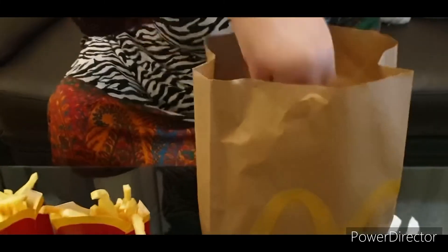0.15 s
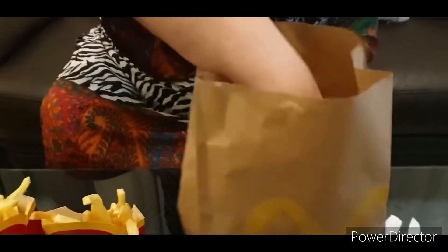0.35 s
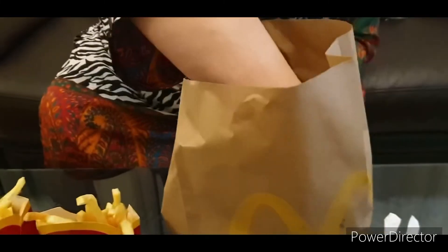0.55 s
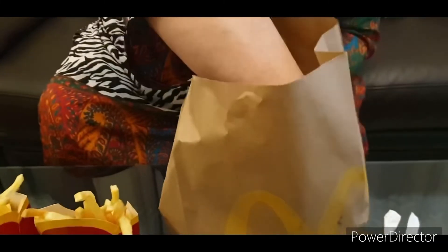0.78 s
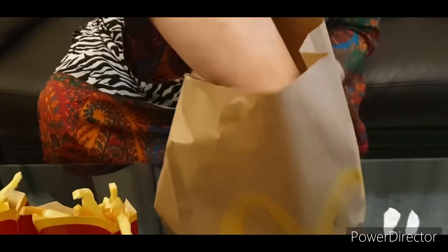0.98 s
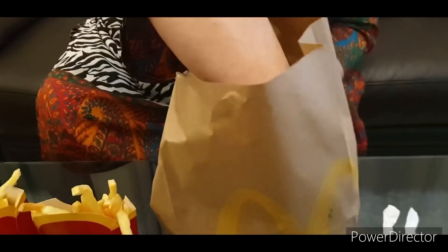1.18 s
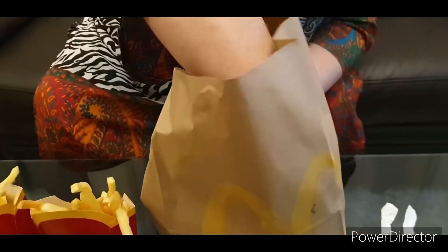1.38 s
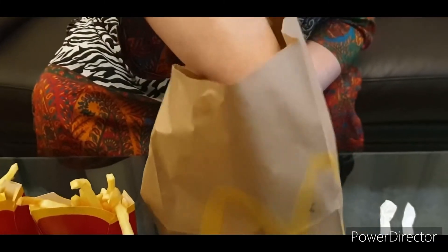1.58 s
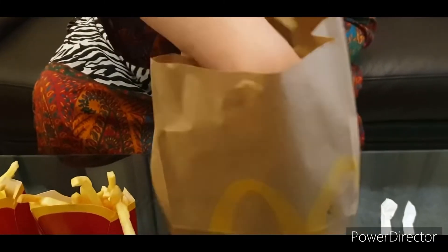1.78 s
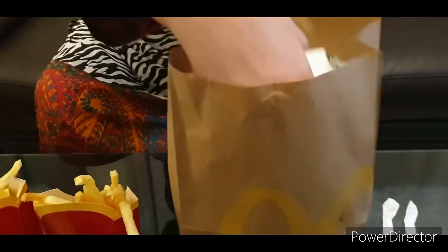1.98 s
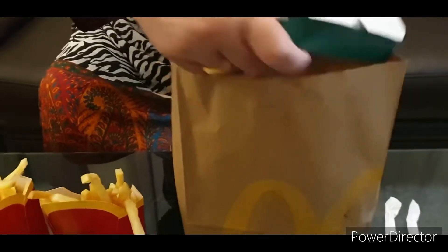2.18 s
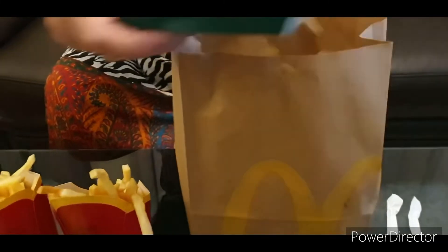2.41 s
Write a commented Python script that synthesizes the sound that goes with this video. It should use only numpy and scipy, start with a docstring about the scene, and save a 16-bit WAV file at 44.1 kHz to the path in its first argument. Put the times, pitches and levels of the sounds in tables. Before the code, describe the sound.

A hand rummages in a stiff paper bag, close and slightly left, in a quiet small room. Nearly silent until 0.2 s, then crinkling and skin hiss; the hardest snaps come at 0.45-0.6 s. It softens around 0.7-0.9 s, crackles densely with dull wall thumps at 0.95-1.3 s, continues in separate snaps to 1.8 s, then thins to light rustles and fades by 2.3 s.

```python
"""In a quiet room, a hand rummages in a paper bag close to a phone.
Creases snap over as short bursts of noise that excite the resonances of the paper, and
dull pushes ring the low modes of the bag when a whole wall pops over. Small crinkles run between
them as decaying noise, the flexing walls rumble, and skin slides along the paper with a rough hiss.
The room adds a short diffuse tail over a faint floor of coloured noise."""
import sys
import numpy as np
from scipy import signal
from scipy.fft import rfft, irfft
from scipy.io import wavfile
from scipy.ndimage import uniform_filter1d, map_coordinates

SR = 44100
rng = np.random.default_rng(int(sys.argv[2]) if len(sys.argv) > 2 else 0)


def to_wav(sig):
    """Store sig (one row per channel, or 1-D mono) as 16-bit WAV at the path in sys.argv[1].

    Samples outside -1..1 are clipped; the rate is SR.
    """
    pcm = np.clip(np.atleast_2d(sig), -1, 1) * 32767
    pcm = np.round(pcm).astype(np.int16)
    wavfile.write(sys.argv[1], SR, pcm.T)  # frames by channels


N = 108045
T = np.arange(N) / SR  # time in seconds

# Background noise spectrum. Each row: frequency in Hz, relative level in dB.
FLOOR_SPECTRUM = [(40, 0), (500, -4), (1300, -12), (7000, -34), (14000, -18)]
# Strength of the handling. Each row: time in seconds, wall flexing in dB, crinkling in dB.
HANDLING = [(0, -54.5, -54), (.09, -73, -80.5), (.18, -58.5, -87), (.22, -43.5, -40.5), (.44, -46, -48),
            (.74, -53, -51.5), (.85, -61.5, -68), (.93, -47.5, -41.5), (1.13, -50, -58.5),
            (1.24, -38.5, -40.5), (1.37, -64.5, -54), (1.45, -47, -49), (1.57, -52, -56.5),
            (1.68, -46, -38.5), (1.84, -46.5, -43), (2.0, -63, -56), (2.13, -46, -44), (2.24, -51.5, -62),
            (2.31, -69.5, -95)]
# Low modes of the bag. Each row: frequency in Hz, gain in dB.
BAG_MODES = [(125, 5), (167, 6.5), (229, 3), (288, -3.5)]
# Modes of the paper. Each row: frequency in Hz, gain in dB.
PAPER_MODES = [(660, -0.5), (930, -7), (1880, -6), (2310, -7)]
# Colours of the crinkles, one to each crinkle. Each row: reference frequency in Hz, relative level in dB.
CRINKLE_COLOURS = [(500, -1.5), (900, 2), (1500, -0.5), (2300, -3.5), (3600, -5.5), (5800, -8.5)]
# Creases snapping over. Each row: start in seconds, drive level in dB, reference pitch of the paper in Hz,
# treble drive against that level in dB, decay time of the treble in ms.
CREASE_SNAPS = [(0.132, -42, 1800, -34, 2), (0.208, -23, 2210, -15.5, 4.2), (0.252, -23.5, 1520, 0, 5.2),
                (.26, -12, 1750, -28, 3.6), (.272, -25.5, 1560, -0.5, 3), (0.357, -19.5, 1920, -15, 2.6),
                (0.386, -15.5, 1980, -10, 4), (0.462, -12.5, 1280, -15, 2.56), (.521, -6, 1930, -5, 2.4),
                (0.591, -4, 2620, -1, 1.02), (0.671, -19.5, 1340, -23, 1.64), (0.78, -27.5, 2250, -24, 1),
                (0.875, -23, 2760, -24, 2.25), (0.936, -24, 1080, -18, 4.8), (.956, -19.5, 970, -9, 2.2),
                (0.989, -14, 1940, -8.5, 2.66), (1.1, -26.5, 630, -46, 3.9), (1.159, -20, 1430, -16, 8.2),
                (1.185, -12.5, 1620, -10, 5.1), (1.193, -17, 780, -4, 3.1), (1.219, -14.5, 2280, -11, 3.1),
                (1.258, -12, 1860, -9, 3.9), (1.269, -12.5, 1010, -9, 3.34), (1.407, -22, 3080, -22, 0.96),
                (1.433, -10.5, 2230, -13, 0.51), (1.445, -24, 600, -19, 5.5), (1.513, -31.5, 1140, -32, 4),
                (1.616, -12.5, 1530, -15, 0.7), (1.714, -12, 1050, -9.5, 3.9),
                (1.783, -12, 1510, -13, 2.15), (1.941, -24, 1790, -30, 2.8), (2.097, -25, 1750, -21, 4.1),
                (2.159, -19.5, 1074, -19, 1.9), (2.33, -42, 755, -44.5, 14.3)]
# Treble spectrum of a snap. Each row: frequency in Hz, gain in dB.
SNAP_TREBLE = [(1500, -16), (3500, 1.5), (6800, -6), (10000, -4), (15000, -13.5)]
# Strength of the sliding skin. Each row: time in seconds, level in dB.
SKIN_LEVELS = [(.18, -92), (.24, -49.5), (.6, -63.5), (.83, -69.5), (.95, -59.5), (1.38, -67.5),
               (1.44, -55.5), (1.65, -50), (2.12, -50), (2.32, -90)]
# Spectrum of the sliding hiss. Each row: frequency in Hz, relative level in dB.
SLIDE_SPECTRUM = [(1000, -8.5), (4000, -3), (12500, 2.5), (15000, -12)]
# Whole walls popping over. Each row: start in seconds, drive level in dB.
WALL_THUMPS = [(.27, -37), (0.389, -36), (0.524, -30.5), (0.676, -33.5), (0.986, -33.5), (1.195, -31),
               (1.271, -29), (1.716, -31.5)]

MODE_Q = 7.5
CRINKLES_PER_S, CRINKLE_SPREAD_DB, CRINKLE_MS = 1500, 2.5, 3.14  # all colours together; decay time
PAPER_STRETCH, TREBLE_LATE_S = 1.97, 0.0014  # decay of the paper against that of the treble; delay
THUMP_MS = 1.1  # rise time of the push
BOOM_APART, PAPER_APART, TREBLE_APART = .22, .4, 1.0  # difference against common part, left and right
FLOOR_DB = -74.5
ROOM_DB, ROOM_T60_S, ROOM_BASS_T60_S = -7.5, .26, .3
LEFT_DB, LEFT_LEAD = 4, 2.7  # left against right; lead in samples
NOTCH_HZ, NOTCH_WIDTH_HZ, LOW_CUT_HZ, TOP_HZ = 7300, 500, 50, 16000


def undb(db):
    """Decibels express the logarithm of an amplitude ratio."""
    return 10 ** (np.asarray(db) / 20)


def unit(x):
    """Division by the root mean square gives unit effective amplitude."""
    return x / np.sqrt(np.mean(x ** 2))


def band(x, lo_hz, hi_hz):
    """A Butterworth band-pass confines a sound to a range of frequencies."""
    return signal.sosfilt(signal.butter(2, [lo_hz, hi_hz], "band", fs=SR, output="sos"), x)


def ring(x, modes):
    """By superposition, the response of a resonant body is the sum of its modes."""
    return sum(undb(db) * signal.lfilter(*signal.iirpeak(hz, MODE_Q, SR), x) for hz, db in modes)


def colour(x, points):
    """A minimum-phase filter, found from the folded cepstrum, imposes a dB curve causally."""
    hz, db = np.array(points, float).T
    bins_hz = np.fft.rfftfreq(2048, 1 / SR)
    log_gain = np.interp(np.log(bins_hz + 1), np.log(hz), db) * np.log(10) / 20
    cepstrum = irfft(log_gain)
    # fold the negative-time half onto the positive
    cepstrum[1:1024] *= 2
    cepstrum[1025:] = 0
    impulse = irfft(np.exp(rfft(cepstrum)))
    return signal.fftconvolve(x, impulse[None], axes=1)[:, :N]


def pair(x, apart):
    """A common part plus a part of opposite signs sets the likeness of left and right."""
    a = np.clip(apart, 0, 1)
    return (x[0] + a * x[1] * np.array([[1], [-1]])) / np.sqrt(1 + a * a)


def walk(rate):
    """Random steps, rate per second, become a slow fluctuation under a moving average."""
    k = int(SR / rate)
    steps = np.repeat(rng.standard_normal(N // k + 1), k)
    return unit(uniform_filter1d(steps, k)[:N])


def catches(per_s, spread_db):
    """Impulses at random times with exponentially spread, capped dB levels model irregular contacts."""
    struck = rng.random(N) < per_s / SR
    return struck * undb(spread_db * np.minimum(rng.exponential(size=N), 3.5))


def decay(hits, ms):
    """A first-order recursion lets each impulse die away exponentially."""
    return signal.lfilter([1], [1, -np.exp(-1000 / (ms * SR))], hits)


def curve(table, column):
    """Linear interpolation in decibels gives a smooth amplitude envelope."""
    points = np.array(table)
    return undb(np.interp(T, points[:, 0], points[:, column]))


def burst(noise, ms):
    """Noise of rough amplitude under a fast rise and an exponential decay sounds as a burst of cracks."""
    t, tau = np.arange(noise.shape[1]) / SR, ms / 1000
    env = (1 - np.exp(-t / (0.13 * tau))) * np.exp(-t / tau)
    roughness = undb(14.8 * uniform_filter1d(noise[2], size=24))
    # keep the energy of the smooth envelope
    return unit(noise[:2] * roughness * env) * np.sqrt(np.mean(env ** 2))


def place(rows, apart):
    """By superposition, sounds given as (start in seconds, sound) add on one time line."""
    out = np.zeros((2, N + SR))
    for s, x in rows:
        start = int(s * SR)
        out[:, start:start + x.shape[1]] += x
    return pair(out[:, :N], apart)


def background():
    """Stationary noise of fixed spectrum, independent left and right, forms the floor."""
    noise = pair(rng.standard_normal((2, N)), 1.0)
    return undb(FLOOR_DB) * unit(colour(noise, FLOOR_SPECTRUM))


def flexing():
    """Fluctuating random forces excite the low modes of the bag walls into a rumble."""
    force = pair(rng.standard_normal((2, N)), BOOM_APART) * undb(3.2 * walk(20))
    return unit(ring(force, BAG_MODES) + band(force, 45, 132)) * curve(HANDLING, 1)


def crinkles():
    """Dense decaying impulses of noise, each in one band, also excite the modes of the paper."""
    x = 0
    for hz, db in CRINKLE_COLOURS:
        env = decay(catches(CRINKLES_PER_S / len(CRINKLE_COLOURS), CRINKLE_SPREAD_DB), CRINKLE_MS)
        noise = pair(env * rng.standard_normal((2, N)), PAPER_APART)
        x = x + undb(db) * unit(band(noise, hz / 1.376, hz * 1.73))
    return unit(x + ring(x, PAPER_MODES)) * curve(HANDLING, 2)


def room(x):
    """A diffuse field decays exponentially, its bass longer and more alike left and right."""
    t = T[:SR // 2]
    noise = rng.standard_normal((2, len(t))) * (1 - np.exp(-t / 0.00077))
    upper = band(noise, 1200, 21400) * undb(-60 * t / ROOM_T60_S)
    bass = band(pair(noise, .3), 90, 695) * undb(-60 * t / ROOM_BASS_T60_S)
    tail = upper + bass
    tail /= np.sqrt(np.sum(tail ** 2) / 2)  # unit energy per side on average
    return undb(ROOM_DB) * signal.fftconvolve(x, tail, axes=1)[:, :N]


def snaps():
    """A buckling crease excites the paper in a band around its pitch, then gives a spray of treble."""
    body_rows, treble_rows = [], []
    for s, db, hz, treble_db, ms in CREASE_SNAPS:
        noise = rng.standard_normal((3, 3000))
        body = band(burst(noise, ms * PAPER_STRETCH), hz / 2.2, hz * 1.327)
        # lower pitches are driven harder
        body_rows.append((s, undb(db) * np.sqrt(1000 / hz) * body))
        treble_rows.append((s + TREBLE_LATE_S, undb(db + treble_db) * burst(noise, ms)))
    body = place(body_rows, PAPER_APART)
    treble = place(treble_rows, TREBLE_APART)
    return body + ring(body, PAPER_MODES) + colour(treble, SNAP_TREBLE)


def sliding():
    """Friction of skin on paper radiates a fine hiss, amplitude-modulated by tiny catches."""
    grain = 1 + 0.4 * decay(catches(300, 2.4), 1.5)
    x = pair(rng.standard_normal((2, N)), TREBLE_APART) * grain * undb(1.6 * walk(40))
    return unit(colour(x, SLIDE_SPECTRUM)) * curve(SKIN_LEVELS, 1)


def thumps():
    """A soft pulse of force, as a wall pops over, excites the low modes of the bag."""
    u = T[:SR // 20] * 1000 / THUMP_MS
    push = np.tile(u * np.exp(1 - u), (2, 1))
    # equal inputs to pair() make the left side the louder
    return ring(place([(s, undb(db) * push) for s, db in WALL_THUMPS], BOOM_APART), BAG_MODES)


def scene():
    """Superposed sources and room reach the left side earlier and louder than the right."""
    bag = flexing() + crinkles() + snaps() + sliding() + thumps()
    bag = bag + room(bag) + background()
    left = map_coordinates(bag[0], [np.arange(N) + LEFT_LEAD], mode="nearest")
    return np.array([left * undb(LEFT_DB / 2), bag[1] * undb(-LEFT_DB / 2)])


def record(dry):
    """Linear filtering cuts the lows, dips the treble and leaves nothing audible above TOP_HZ."""
    x = signal.lfilter(*signal.iirnotch(NOTCH_HZ, NOTCH_HZ / NOTCH_WIDTH_HZ, SR), dry)
    x = signal.sosfilt(signal.butter(2, LOW_CUT_HZ, "high", fs=SR, output="sos"), x)
    return signal.sosfilt(signal.ellip(10, .2, 80, TOP_HZ, fs=SR, output="sos"), x)


dry = scene()
out = record(dry)
to_wav(out)
```